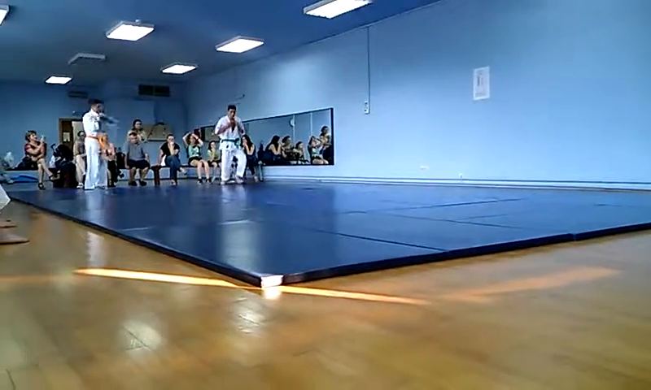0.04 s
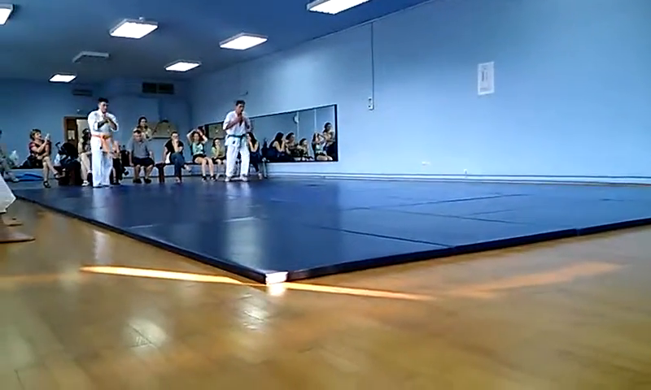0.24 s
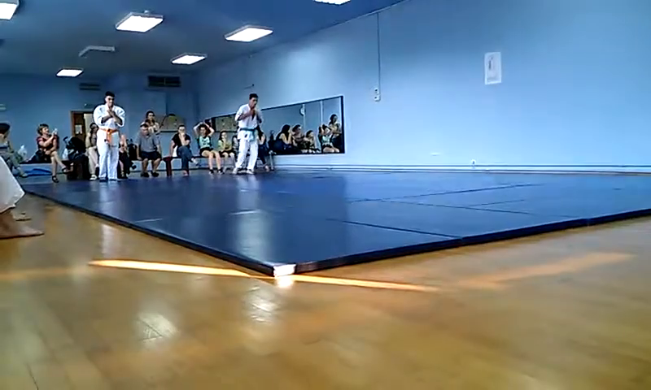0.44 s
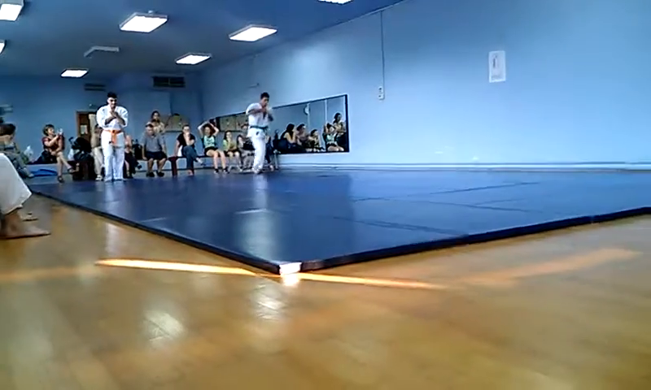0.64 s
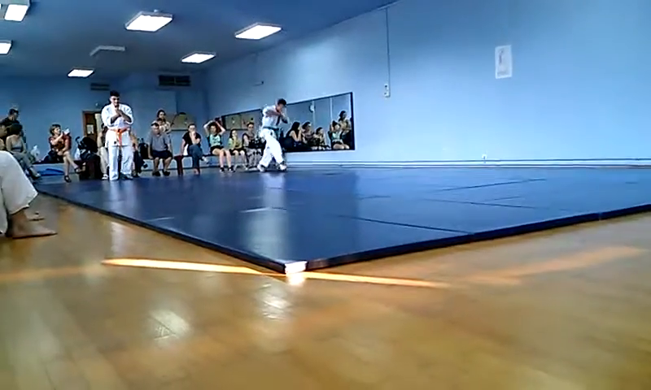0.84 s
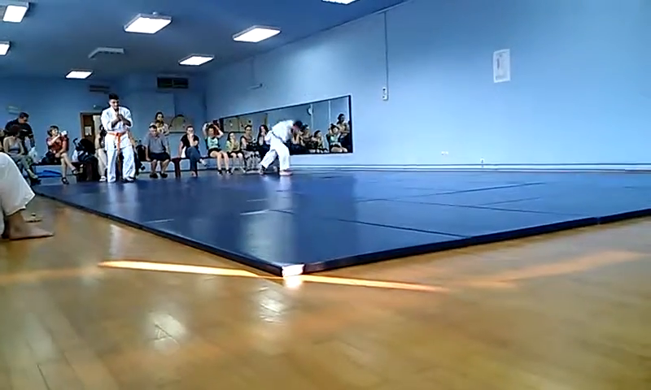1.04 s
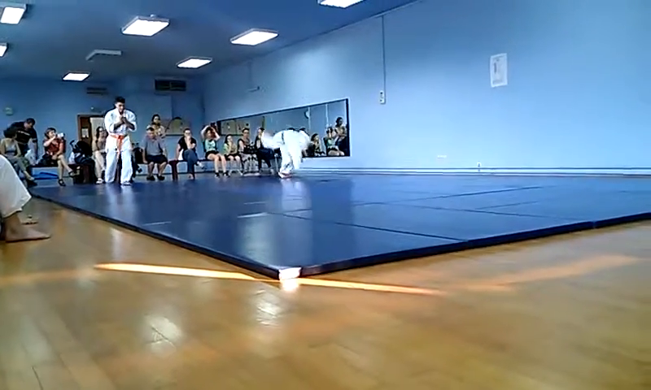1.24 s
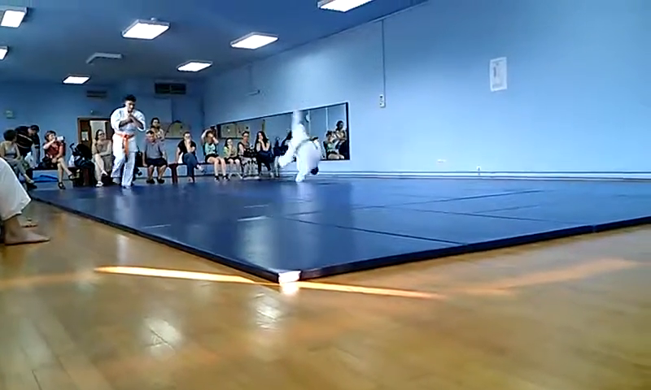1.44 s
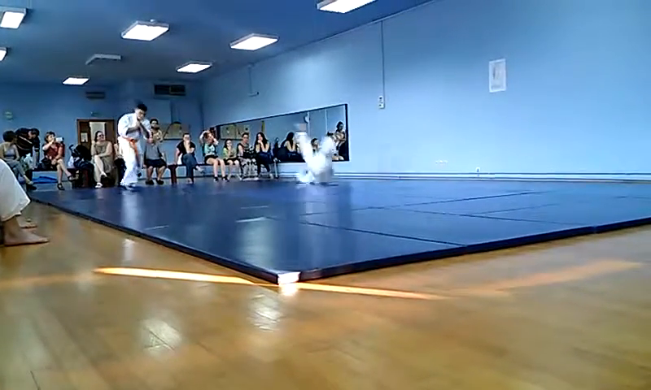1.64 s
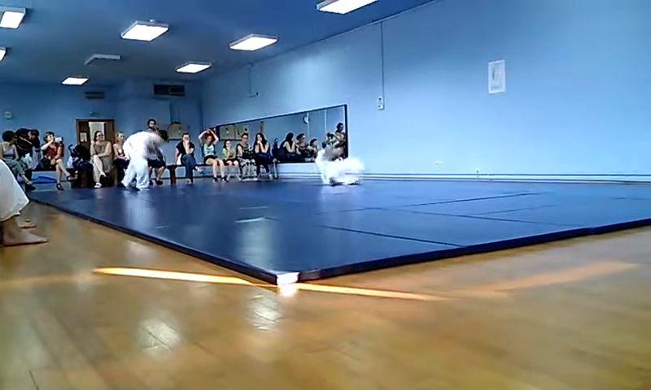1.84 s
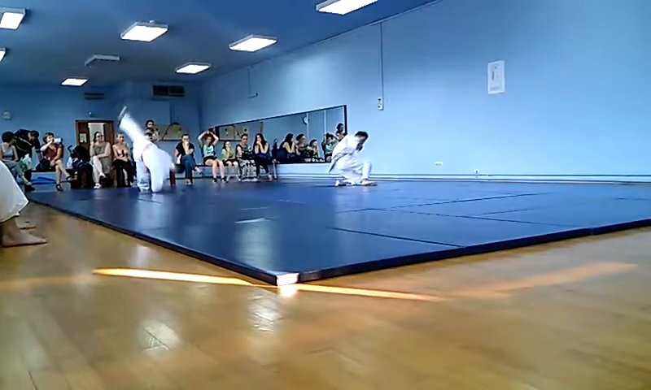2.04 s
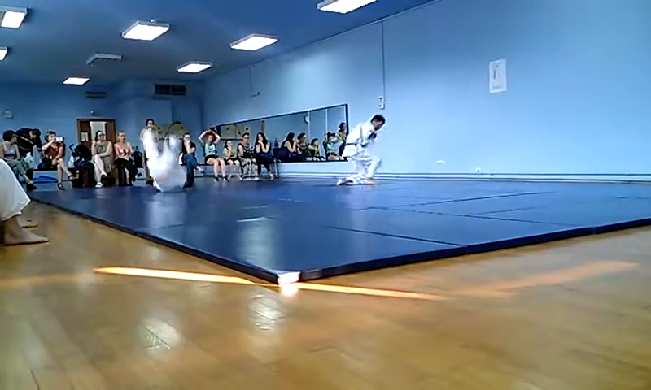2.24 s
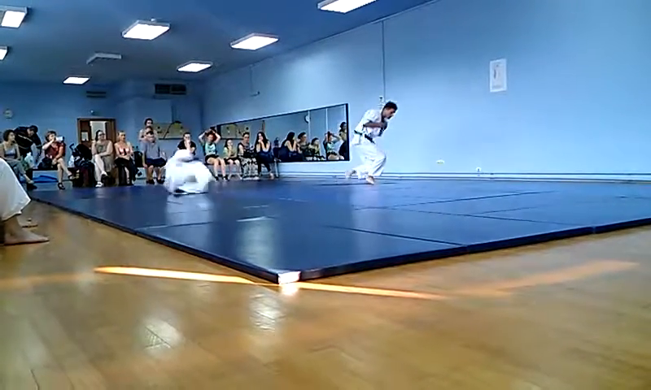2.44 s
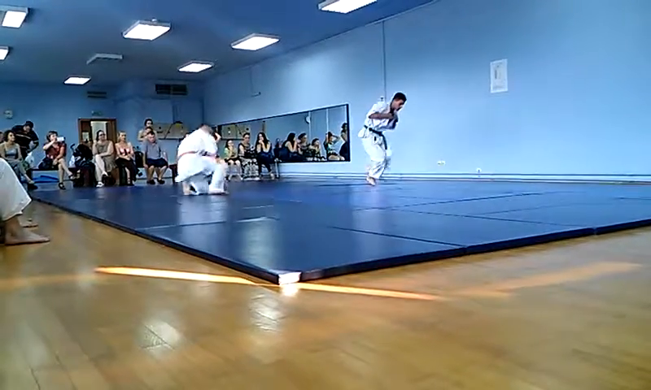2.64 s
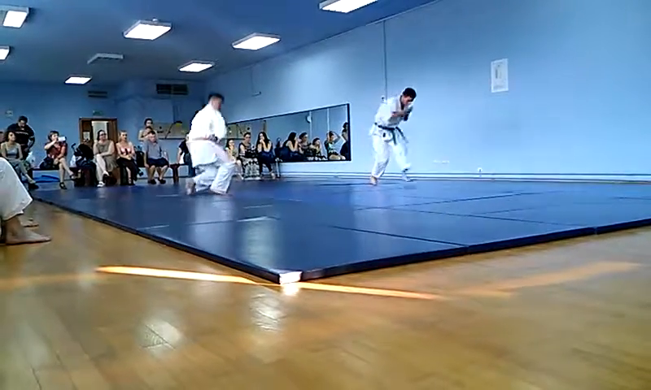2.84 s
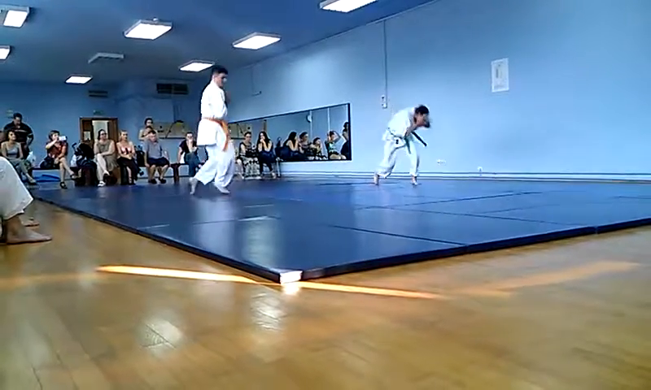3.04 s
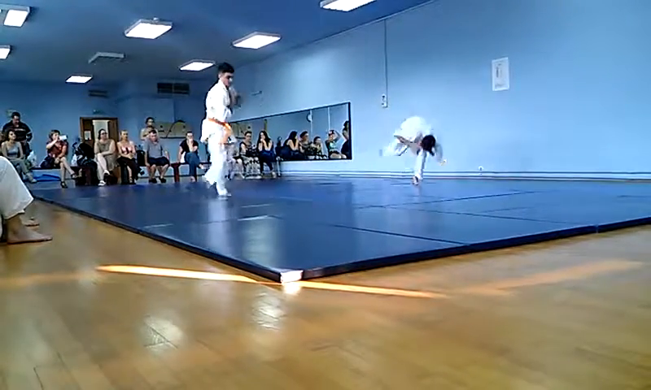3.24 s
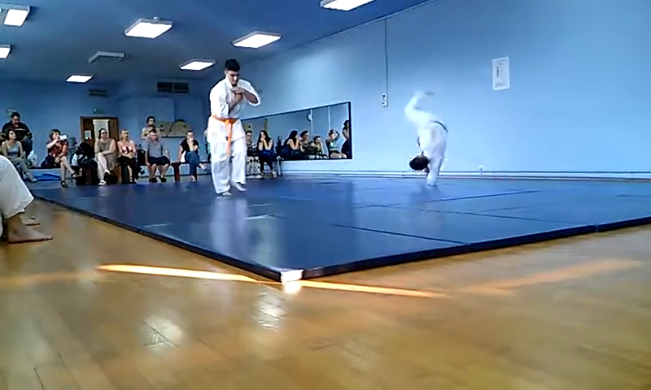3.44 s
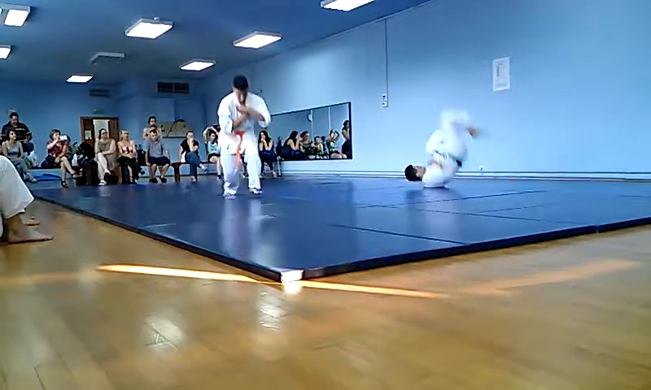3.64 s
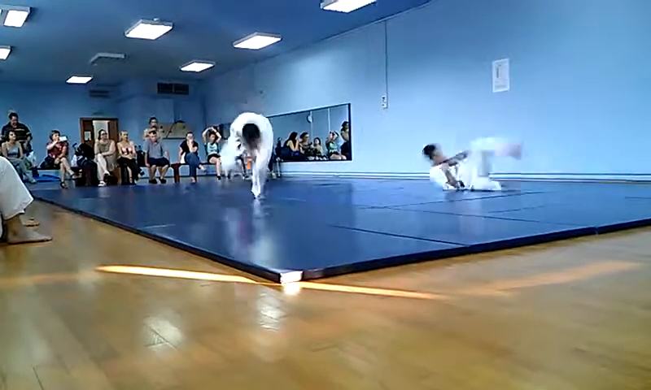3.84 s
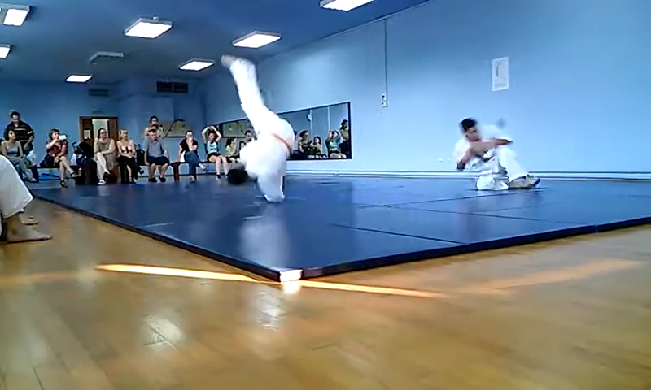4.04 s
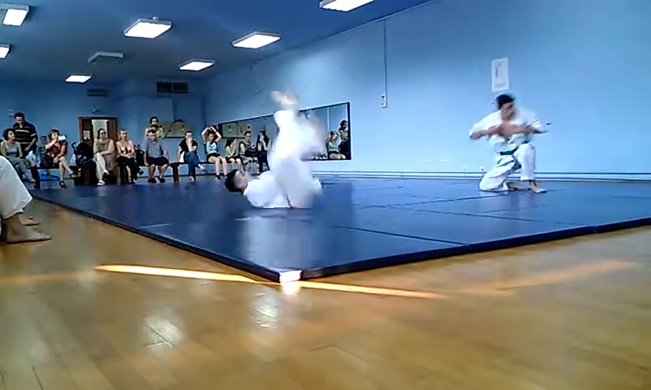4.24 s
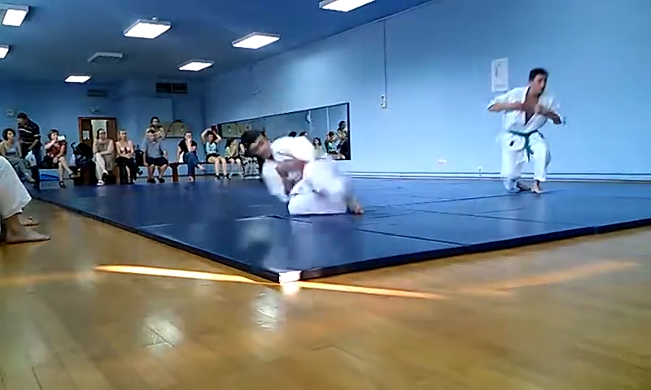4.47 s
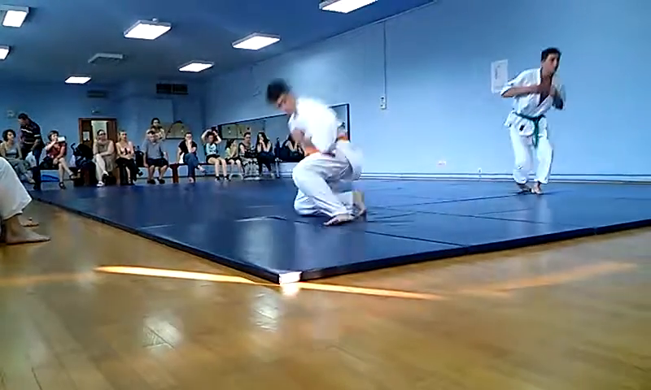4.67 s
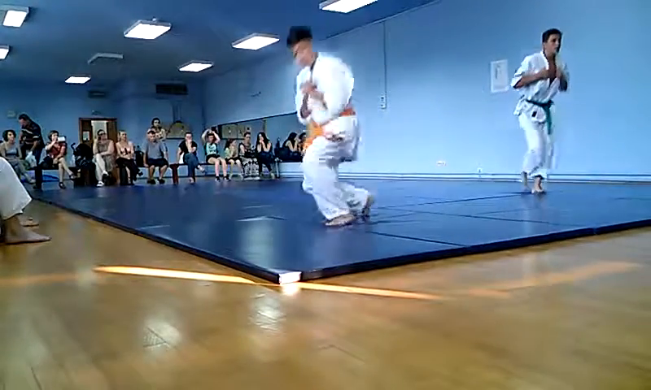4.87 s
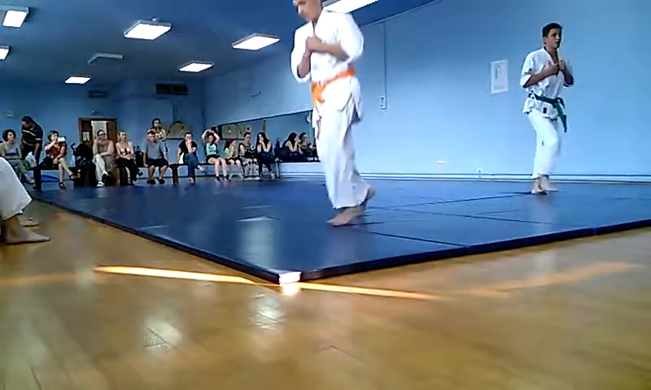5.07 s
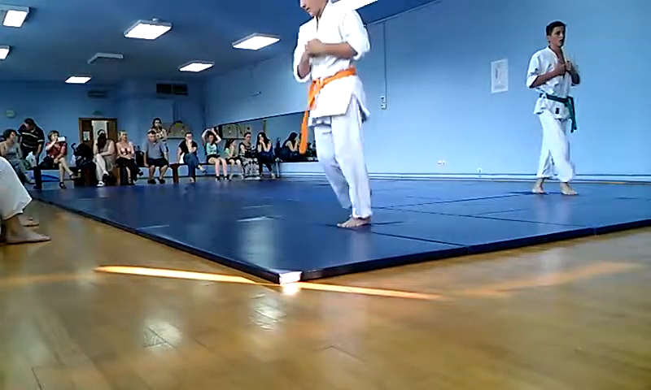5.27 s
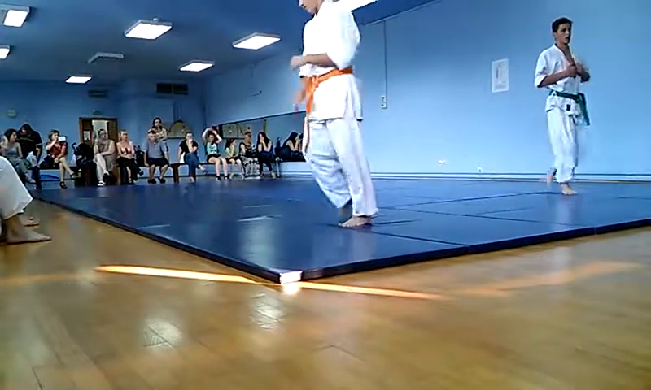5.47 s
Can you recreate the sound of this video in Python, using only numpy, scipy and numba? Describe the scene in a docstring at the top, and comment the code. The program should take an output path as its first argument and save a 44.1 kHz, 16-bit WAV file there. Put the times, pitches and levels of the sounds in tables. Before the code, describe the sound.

A very faint room hum and thin whistle, then a compact double thump and a longer, heavier one around two seconds. After about a second of near silence, a deep thud and then the loudest, crackling slap and rumble. Cloth scrapes over mat, the hall returns a short diffuse tail, and soft barefoot steps finish. The floor-level phone microphone ducks the quiet parts.

```python
"""Under lamp hum, ventilation and a thin whistle, two people take turns at forward rolls on gym mats in a hall,
coming nearer to a phone on the wooden floor. Landings boom as decaying bending modes of the sprung floor; arms
and soles slap the vinyl as noise bursts over ringing air pockets; cloth and foam drag as slow-gated noise.
The hall answers with a diffuse noise tail, and the phone's expander lowers all of it between the falls."""
import sys
import numpy as np
from scipy import signal
from scipy.fft import rfft, irfft, next_fast_len
from scipy.io import wavfile
from scipy.ndimage import uniform_filter1d
from numba import njit

SR = 44100
rng = np.random.default_rng(int(sys.argv[2]) if len(sys.argv) > 2 else 0)


def nominal_scale(level):
    """Amplitude ratio for a level in decibels (scalar or array-like)."""
    x = np.asarray(level, float) / 20
    return 10 ** x


def digitize_waveform(pressure):
    """Quantize a signal to 16-bit integers and store it at the path in sys.argv[1].

    Rows of a 2-D input are taken as channels; values are limited to [-1, 1].
    """
    field = np.atleast_2d(pressure).T
    bounded = np.clip(field, -1, 1)
    quanta = np.round(bounded * 32767).astype(np.int16)
    wavfile.write(sys.argv[1], SR, quanta)


N = 242991  # samples


def shape(x, points):
    """Linear filtering: weight the spectrum by (frequency_hz, gain_db) points joined on a log frequency axis."""
    hz, db = np.transpose(points)
    size = next_fast_len(len(x))
    log_hz = np.log(np.arange(size // 2 + 1) * SR / size + 1)
    gain = nominal_scale(np.interp(log_hz, np.log(hz), db))
    return irfft(rfft(x, size) * gain, size)[:len(x)]


def unit(x):
    """Normalisation of signal power: scale to rms 1."""
    return x / np.sqrt(np.mean(x ** 2))


def curve(rows):
    """Amplitude envelope through (time_s, level_db) rows, silent outside them."""
    s, db = np.transpose(rows)
    return nominal_scale(np.interp(np.arange(N) / SR, s, db, left=-200, right=-200))


def swells(rows, rise_s, fall_s):
    """Exponential relaxation: each (start_s, hold_s, level_db) row rises, holds and dies away."""
    t = np.arange(N) / SR
    gain = np.zeros(N)
    for s, hold, db in rows:
        rise = 1 - np.exp(-np.maximum(t - s, 0) / rise_s)
        fall = np.exp(-np.maximum(t - s - hold, 0) / fall_s)
        gain += nominal_scale(db) * rise * fall
    return gain


def walk(rate):
    """Low-frequency random modulation: levels held for 1 / rate seconds and smoothed twice."""
    k = int(SR / rate)
    held = np.repeat(rng.standard_normal(N // k + 1), k)
    return uniform_filter1d(uniform_filter1d(held, k), k)[:N]


def add(track, s, sound):
    """Superposition: mix a sound in at time s."""
    i = int(s * SR)
    track[i:i + len(sound)] += sound[:N - i]


def lift(x, peaks):
    """Resonance: add the excess of each (centre_hz, width_hz, lift_db) band to the sound."""
    for hz, width_hz, db in peaks:
        x = x + (nominal_scale(db) - 1) * signal.lfilter(*signal.iirpeak(hz, hz / width_hz, fs=SR), x)
    return x


# Body weight landing on the floor: start_s [s], level_db [dB], pitch_hz of the floor at that spot [Hz],
# ring_s [s]
LANDINGS = [(1.714, -8, 188, 0.015), (1.733, -9, 69, 0.048), (1.792, -15, 66.9, 0.03),
            (1.819, -8, 76.7, 0.037), (1.883, -21.5, 68.4, 0.061), (1.95, -23, 69, 0.06),
            (2.135, -25, 85.6, 0.049), (2.298, -6, 71.4, 0.093), (2.375, -4.5, 87.7, 0.049),
            (2.447, -16, 69.5, 0.075), (2.48, -13.5, 65.6, 0.058), (2.6, -24.5, 69, 0.054),
            (3.608, -9.5, 64, 0.061), (3.69, -22, 70, 0.041), (3.732, 2, 86, 0.028), (3.771, -1, 68, 0.023),
            (3.798, -8, 70, 0.051), (3.866, -13, 80.4, 0.02), (3.937, -13, 70.5, 0.046),
            (4.033, -20, 81.8, 0.019), (4.181, -14, 223.5, 0.025), (4.208, -20, 333, 0.021),
            (4.234, -1.5, 65.1, 0.07), (4.305, -4.5, 68.3, 0.063), (4.362, -14, 205, 0.068),
            (4.406, -4.5, 64.7, 0.086), (4.476, -10.5, 67.1, 0.071), (4.555, -18.5, 71, 0.032),
            (4.65, -15, 64.9, 0.071), (4.76, -26, 65.6, 0.055), (4.898, -30, 69, 0.021),
            (5.112, -26, 68.7, 0.033), (5.181, -28, 68.2, 0.052), (5.233, -32.5, 122.2, 0.035)]
# Modes of the boards under a landing: multiple of pitch_hz [ratio], level_db [dB], share of ring_s [ratio]
BOARD_MODES = [(1, -5, 1), (0.719, -20, .8), (1.251, -11, 0.65), (1.55, -8.5, 0.35), (2.1, -18.5, 0.96),
               (3, -19.5, 0.24)]


def thuds():
    """Dispersion of bending waves: the higher part arrives first, so each decaying mode sags in pitch."""
    out = np.zeros(N)
    t = np.arange(SR // 2) / SR
    sag_s = 0.19 * 0.0087 * (1 - np.exp(-t / 0.01))  # phase lead, so the pitch starts high
    onset = 1 - np.exp(-t / 0.0058)
    for s, db, hz, ring_s in LANDINGS:
        for multiple, mode_db, share in BOARD_MODES:
            ring = onset * np.exp(-(t / (ring_s * share)) ** 5.6)
            mode = np.sin(2 * np.pi * hz * multiple * (t + sag_s))
            add(out, s, nominal_scale(db + mode_db) * ring * mode)
    return out


# Skin and cloth smacking vinyl: time_s [s], level_db [dB], bright_db of the crack [dB],
# hall_db sent to the hall [dB], pocket_hz of the enclosed air [Hz]
SLAP_HITS = [(1.643, -27.5, -2.5, 7.5, 1450), (1.695, -21, -5, -5, 2620), (1.724, -27, -33.5, -8, 700),
             (1.820, -35, 1.5, 8.5, 660), (2.297, -14, -17, 2.5, 1217), (2.308, -15, -16.5, 4, 570),
             (2.341, -19.5, -32, 0, 905), (2.380, -19, -34, -18, 382), (2.42, -45, -25, -4, 570),
             (3.595, -32.5, -27, -5, 2160), (3.674, -28.5, -7.5, -5, 1037), (3.727, -19.5, -27.5, 1, 2233),
             (3.745, -22.5, -32.5, 2, 526), (3.779, -20, 0, 0.5, 614), (3.828, -27, -4.5, -9.5, 1430),
             (3.876, -36, 1, -2.5, 1450), (3.889, -33.5, 0, 5.5, 920), (4.114, -36, -32, 7.5, 1007),
             (4.136, -34.5, -30.5, 3.5, 786), (4.158, -31.5, -32, -1.5, 1410),
             (4.19, -15.5, -14, -10, 4700), (4.196, -30.5, -16, -7, 5450), (4.232, -0.5, -3, -4.5, 3490),
             (4.242, -9, -17, -6.5, 1370), (4.298, -18.5, -28, 11.5, 348.5), (4.372, -17, 0, 11.5, 1420),
             (4.420, -9.5, 2, -1, 6980)]
# Colour of the dull puff: frequency_hz [Hz], gain_db [dB]
PUFF_COLOUR = [(300, -6.5), (700, -3), (1300, -9.5), (1900, -3), (3500, -3.5), (5000, -6.5), (8000, -24.5),
               (15000, -38.5)]


def slaps():
    """Air expulsion: a limb squeezes out a noise burst, brighter for bare skin, and knocks the pocket it closes."""
    near, far = np.zeros(N), np.zeros(N)
    t = np.arange(SR // 10) / SR
    late = np.maximum(t - 0.0012, 0)  # the crack follows the puff by 1.2 ms
    for s, db, bright_db, hall_db, pocket_hz in SLAP_HITS:
        contact_s = 0.0035 * nominal_scale(-0.28 * db)  # weaker slaps stay in contact longer
        puff = (1 - np.exp(-t / 0.0025)) * np.exp(-t / contact_s)
        crack = 0.66 * (1 - np.exp(-late / 0.00045)) * np.exp(-late / (0.82 * contact_s))
        dull, crisp = rng.standard_normal((2, len(t)))
        dull = shape(dull, PUFF_COLOUR)
        crisp = shape(crisp, [(2500, -11.5), (5000, 8.5), (8000, 0.5), (12000, -9), (16000, -23.5)])
        # pockets pitched above 1200 Hz are small and knock more weakly
        knock_gain = nominal_scale(5.5) * min(1200 / pocket_hz, 1) ** 2
        knock = knock_gain * np.sin(2 * np.pi * pocket_hz * t) * t / 0.0029 * np.exp(-t / 0.0037)
        burst = nominal_scale(db) * (puff * unit(dull) + nominal_scale(bright_db) * crack * unit(crisp) + knock)
        add(near, s - 0.002, burst)
        add(far, s - 0.002, nominal_scale(hall_db) * burst)
    return near, far


# How hard the back drags, one list for each of the four rolls: time_s [s], level_db of the cloth [dB]
ROLL_DRAG = [
    [(1.54, -52), (1.59, -39), (1.64, -30.5), (1.68, -35), (1.72, -33.5), (1.84, -32.5), (1.93, -43.5),
     (2.12, -43.5)],
    [(2.12, -46.5), (2.23, -38.5), (2.285, -29.5), (2.30, -25), (2.43, -26), (2.60, -39.5), (2.72, -56.5)],
    [(3.53, -64), (3.58, -36.5), (3.63, -47.5), (3.69, -32), (3.74, -29.5), (3.80, -28), (3.86, -34.5),
     (3.95, -39.5), (4.08, -51.5)],
    [(4.08, -55), (4.12, -42.5), (4.165, -33), (4.225, -33.5), (4.25, -24.5), (4.38, -19), (4.44, -23.5),
     (4.65, -41), (4.75, -42.5), (4.9, -97)],
]
# Foam against cloth, one value for each roll: level_db [dB]
FOAM_OVER_CLOTH = [3.0, 3.5, 2.5, -2.5]
# Colour of cloth on vinyl: frequency_hz [Hz], gain_db [dB]
VINYL_COLOUR = [(500, -21), (1000, -2), (1400, 6.5), (1850, -3), (3100, -0.5), (4800, -8), (7000, -12.5),
                (10700, -22.5), (15800, -60)]
# Colour of crushed foam, also under soles: frequency_hz [Hz], gain_db [dB]
FOAM_COLOUR = [(120, -21), (250, 1), (400, -2), (580, -0.5), (900, 0), (1350, -8), (1700, -44)]


def drag():
    """Stick-slip friction: heavy cotton creases over vinyl in grains, and foam gives way in lumps under the weight."""
    grain = nominal_scale(3.17 * walk(60) + 0.83 * walk(400))
    cloth = unit(shape(rng.standard_normal(N) * grain, VINYL_COLOUR))
    rub = sum(map(curve, ROLL_DRAG)) * cloth
    rolling = sum(nominal_scale(db) * curve(rows) for rows, db in zip(ROLL_DRAG, FOAM_OVER_CLOTH))
    # each landing crushes the foam too
    squash = swells([(s, 0, db - 25.5) for s, db, _, _ in LANDINGS], rise_s=0.008, fall_s=0.022)
    lumps = nominal_scale(0.81 * walk(40))
    foam = unit(shape(rng.standard_normal(N) * lumps, FOAM_COLOUR))
    return rub + (rolling + squash) * foam


# Soles set down on the mat: start_s [s], level_db [dB], pocket_hz of the enclosed air [Hz]
SOLES = [(2.028, -47, 860), (3.055, -42, 582), (5.035, -42, 448), (5.09, -44, 444), (5.14, -49, 900),
         (5.19, -41.5, 536), (5.235, -44, 545)]


def steps():
    """Cavity excitation: a soft sole gives a dull puff from the foam and a hollow knock longer than a slap's."""
    out = np.zeros(N)
    t = np.arange(SR // 10) / SR
    envelope = t / 0.0089 * np.exp(1 - t / 0.0075)
    for s, db, pocket_hz in SOLES:
        puff = nominal_scale(-5.5) * unit(shape(rng.standard_normal(len(t)), FOAM_COLOUR))
        knock = np.sin(2 * np.pi * pocket_hz * t)
        add(out, s, nominal_scale(db) * envelope * (knock + puff))
    return out


# Getting up and shuffling: start_s [s], hold_s [s], level_db [dB], centre_hz of the rustle [Hz]
RUSTLES = [(1.223, 0.086, -54.5, 2560), (2.9, 0.053, -57, 4030), (3.04, 0.14, -52, 4400),
           (3.278, 0.1, -50, 3600), (4.945, 0.082, -58, 4510), (5.292, .1, -57.5, 8500)]
# Colour of moving cloth: frequency_hz [Hz], gain_db [dB]
CLOTH_COLOUR = [(1000, -25), (2400, -3), (3700, 0), (6000, -4), (9300, -6), (15000, -22)]


def shuffle():
    """Friction noise: faint cloth and soles rustle in a broad band, unsteadily, while they get up."""
    out = np.zeros(N)
    wide = 2 ** 1.8  # the band has fallen by 14 dB at 1.8 octaves from its centre
    for s, hold, db, hz in RUSTLES:
        rustle = shape(rng.standard_normal(N), CLOTH_COLOUR)
        rustle = shape(rustle, [(hz / wide, -14), (hz, 0), (hz * wide, -14)])
        out += swells([(s, hold, db)], rise_s=0.0073, fall_s=0.06) * unit(rustle)
    return out * nominal_scale(2 * walk(40))


# Pockets of air under the mats that sing along: centre_hz [Hz], width_hz [Hz], lift_db [dB]
MAT_POCKETS = [(205, 29, 9.5), (406, 26, 4.5), (553, 20, 3.5), (660, 12, 4), (878, 10, 4.5), (1243, 8.3, 6),
               (1476, 49, 3), (1975, 40, 2), (2193, 50, 3)]


def mat_pockets(x):
    """Sympathetic resonance: air under the mats rings at its own pitches when the sound drives it."""
    return lift(x, MAT_POCKETS)


def rumble(x):
    """Reverberation as convolution: floor and hall air keep a boom going unevenly, falling 60 dB in 0.49 s."""
    t = np.arange(SR) / SR
    build = 1 - np.exp(-(t / 0.059) ** 2)
    tail = rng.standard_normal(SR) * nominal_scale(-60 * t / 0.49) * build
    return signal.fftconvolve(x, tail / np.sqrt(np.sum(tail ** 2)))[:N]


# What plaster and people give back: frequency_hz [Hz], gain_db [dB]
WALL_REFLECTION = [(200, -5), (5500, -1.5), (8000, -9), (12000, -10.5), (16000, -14.5)]
# Reverberation time, a fall of 60 dB: frequency_hz [Hz], t60_s [s]
REVERBERATION = [(300, 0.58), (900, 0.59), (2400, 1), (5000, 0.89), (7500, 0.96), (11000, 0.37),
                 (15000, .4)]


def hall(x):
    """Diffuse field: reflections too dense to tell apart return each band's energy as fading noise."""
    hz, _, spectrum = signal.stft(shape(x, WALL_REFLECTION), SR, nperseg=1024)
    noise = signal.stft(rng.standard_normal(N), SR, nperseg=1024)[2]
    t = np.arange(150) * 512 / SR  # one step per half frame
    build = 1 - np.exp(-(t / 0.017) ** 2)
    t60_s = np.interp(hz, *np.transpose(REVERBERATION))[:, None]
    fade = nominal_scale(-120 * t / t60_s) * build  # doubled dB, since it weights energy
    fade = fade / fade.sum(axis=1, keepdims=True)
    power = uniform_filter1d(abs(spectrum) ** 2, size=3, axis=0)
    energy = signal.fftconvolve(power, fade, axes=1)[:, :power.shape[1]]
    carrier = unit(abs(noise)) * np.exp(1j * np.angle(noise))
    return signal.istft(carrier * np.sqrt(abs(energy)), SR)[1][:N]


# Colour of the ventilation: frequency_hz [Hz], gain_db [dB]
VENT_COLOUR = [(15, -39), (30, 2.5), (65, -3), (130, -1), (170, -16.5), (270, -14), (500, -18.5),
               (950, -18.5), (1400, -21.5), (1700, -28.5), (2400, -24.5), (3300, -30), (5000, -29.5),
               (6500, -34), (15800, -47)]
# The room noise swells a little: time_s [s], level_db [dB]
VENT_LEVEL = [(0, -42), (.9, -41.5), (1.16, -43), (2.8, -43), (3.1, -38), (3.5, -39), (4.9, -44),
              (5.3, -41), (5.51, -41.5)]
# Hum of lamps and fans: pitch_hz [Hz], level_db [dB], wander_hz [Hz], swell_db [dB]
HUM_TONES = [(299, -47.5, 2, 3.5), (192.6, -55.5, 4.9, 6), (133, -59, 9.1, 7.5)]
# A thin whistle comes and goes: start_s [s], hold_s [s], level_db [dB]
WHISTLE_SPELLS = [(.1, 0.62, -51), (.9, 0.19, -63), (1.26, 0.072, -53), (1.45, 1.5, -53),
                  (3.25, 0.45, -51.5), (5.26, 0.35, -49)]


def air():
    """Broadband and tonal noise: coloured ventilation, with hums and a whistle as wavering sines."""
    vent = curve(VENT_LEVEL) * unit(shape(rng.standard_normal(N), VENT_COLOUR))
    whistle = np.sin(2 * np.pi * np.cumsum(986 + 6 * walk(30)) / SR)
    out = vent + swells(WHISTLE_SPELLS, rise_s=0.013, fall_s=0.18) * whistle
    for hz, db, wander_hz, swell_db in HUM_TONES:
        level = nominal_scale(db + swell_db * walk(5))
        out += level * np.sin(2 * np.pi * np.cumsum(hz + wander_hz * walk(30)) / SR)
    return out


def scene():
    """Structure-borne and airborne paths: floor booms arrive direct; slaps and rolls come by air with much hall."""
    low, roll, soles = thuds(), drag(), steps()
    near, far = slaps()
    reverberant = hall(far + nominal_scale(-8) * roll + nominal_scale(5.5) * soles)
    mats = mat_pockets(nominal_scale(-5.5) * roll + reverberant)
    floor = low + nominal_scale(-14.5) * rumble(low)
    return (floor + near + soles + mats + shuffle() + air())[None]


# Hollow under the phone and its port: centre_hz [Hz], width_hz [Hz], lift_db [dB]
PORT_PEAKS = [(570, 41, 1.5), (1373, 210, 0.5), (3080, 800, -2.5), (3600, 220, 1), (4860, 370, 3)]


def port(x):
    """Cavity resonance: the hollow under the phone and its port colour all that reaches the microphone."""
    return lift(x, PORT_PEAKS)


@njit
def follow(power, rise, fall):
    """Leaky integration of power, quicker up than down; rise and fall are shares per sample."""
    out, e = np.empty(len(power)), power[:20000].mean()
    for i in range(len(power)):
        e += (power[i] - e) * (rise if power[i] > e else fall)
        out[i] = e
    return out


def expander(x):
    """Downward expansion: every dB of level below -25 dB costs a further 1.252 dB."""
    power = uniform_filter1d(x ** 2, size=600)
    power = follow(power, 1 / (0.053 * SR), 1 / (0.11 * SR))  # opens in 53 ms, shuts in 110 ms
    level_db = 10 * np.log10(power + 1e-12)
    return x * nominal_scale(np.minimum(1.252 * (level_db + 25), 0))


def top_cut(x):
    """Nothing passes above the cut-off."""
    return signal.sosfilt(signal.butter(12, 16470, fs=SR, output="sos"), x)


def record(dry):
    """Transducer chain: bass cut, port resonances, expander, converter hiss, soft overload and top cut."""
    x = signal.sosfilt(signal.butter(2, 42, "high", fs=SR, output="sos"), dry[0])
    x = expander(port(x))
    # the converter's own hiss lies behind the expander
    x = x + nominal_scale(-81) * rng.standard_normal(N)
    x = np.tanh(0.5 * x) / 0.5
    x = signal.sosfilt(signal.ellip(8, 0.2, 70, 15800, fs=SR, output="sos"), x)
    return top_cut(x[None])


dry = scene()
out = record(dry)
digitize_waveform(out)
```